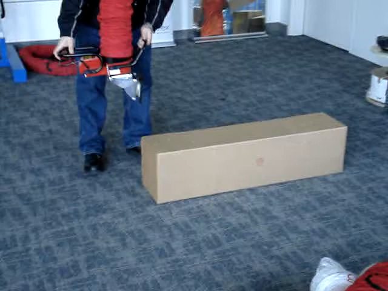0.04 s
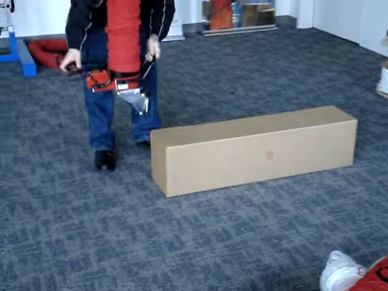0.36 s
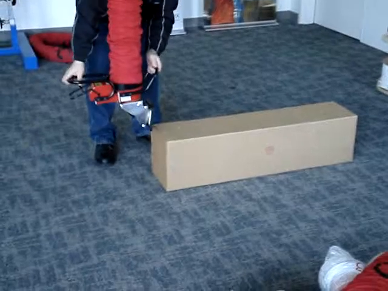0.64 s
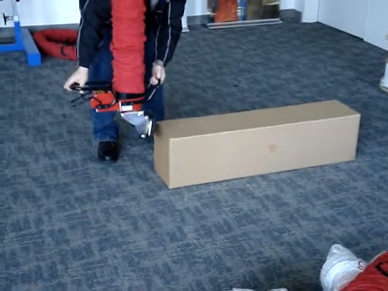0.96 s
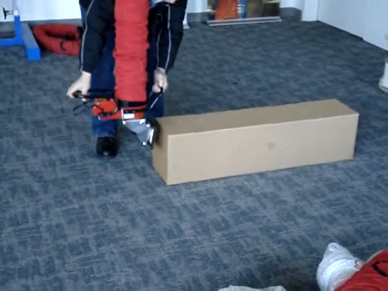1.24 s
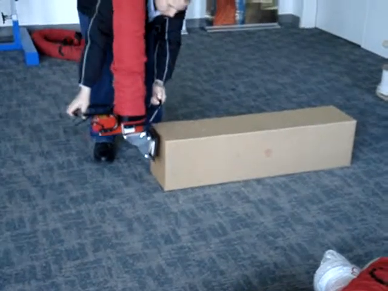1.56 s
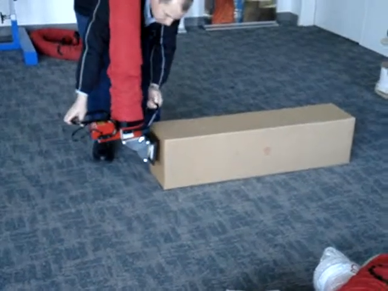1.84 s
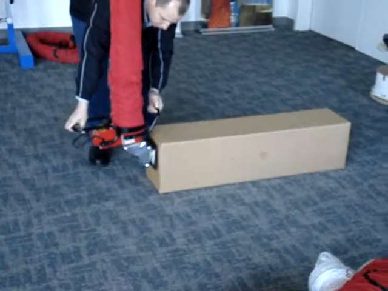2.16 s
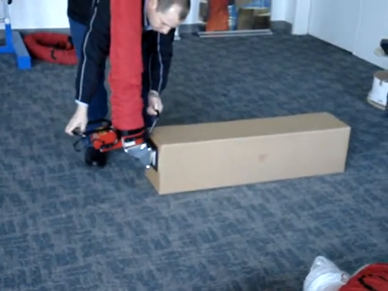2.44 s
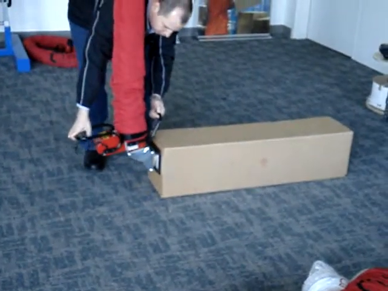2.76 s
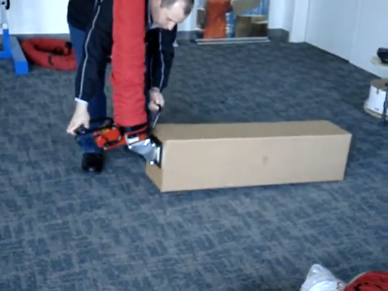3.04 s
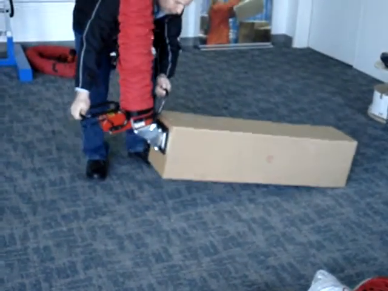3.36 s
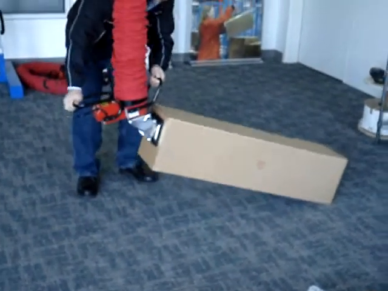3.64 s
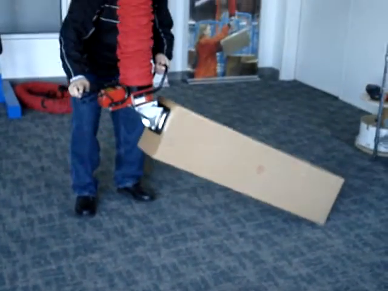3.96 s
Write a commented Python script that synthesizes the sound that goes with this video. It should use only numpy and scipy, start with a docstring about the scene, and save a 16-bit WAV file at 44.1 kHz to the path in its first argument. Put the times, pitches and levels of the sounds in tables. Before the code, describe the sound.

In a carpeted room, a vacuum lifter sucks air with a bright rush that gradually turns hollow. A rattling clack marks it sealing onto a cardboard box, followed by a leaking hiss and a drone, with a pump humming faintly underneath.

```python
"""Air rushes into the open suction foot of a vacuum tube lifter, ringing its cavity and sizzling at the rim.
The bright rush dulls to a hollow roar as the foot nears a cardboard box. The foot snaps on with a clack; from
then on air hisses through the leaking seal and a motor valve drones. The pump hums underneath, in a carpeted
room."""
import sys
import numpy as np
from scipy import signal
from scipy.fft import rfft, irfft
from scipy.io import wavfile

SR = 44100
rng = np.random.default_rng(int(sys.argv[2]) if len(sys.argv) > 2 else 0)


def wav_record(signal):
    """Record a signal, one row per channel, as 16-bit PCM in the file named by sys.argv[1]."""
    frames = np.transpose(np.atleast_2d(signal))
    bounded = np.clip(frames, -1, 1)
    # unit amplitude maps onto the largest positive 16-bit level
    quanta = np.round(bounded * 32767).astype(np.int16)
    wavfile.write(sys.argv[1], SR, quanta)


N = 176400
T = np.arange(N) / SR
SEAL_S = 2.851   # foot grips box

# Flow through the open foot: time_s, level_db
INTAKE_LEVEL = [(0.08, -20), (0.47, -19.5), (0.65, -22), (0.9, -25.5), (1.2, -28), (1.7, -29.5),
                (2.2, -32.5), (2.45, -37.5), (2.8, -38.5), (3.0, -53)]
# Rush spectrum: freq_hz, relative_db
INTAKE_SPECTRUM = [(100, -33.5), (280, -22.5), (440, -8), (530, -22), (650, -7.5), (900, -5.5),
                   (1100, -0.5), (1240, -2), (1450, 0), (1740, 3), (1900, -7.5), (2250, -6), (2520, -4.5),
                   (2950, -12.5), (4100, -14), (4700, -9), (5300, -9.5), (5900, -15.5), (7500, -17.5),
                   (10000, -34.5)]
# Foot cavity resonances: pitch_hz, width_hz, relative_db
FOOT_RESONANCES = [(457.4, 30, -18.5), (630, 25, -20), (731, 18, -19.5), (1108, 14, -12.5), (1548, 16, -16),
                   (1745, 120, -17), (2494, 22, -18.5), (3710, 70, -23), (4810, 620, -19)]
# Rim sizzle spectrum: freq_hz, relative_db
SIZZLE_SPECTRUM = [(1500, -13), (2600, 0), (4500, -13), (6000, -3), (7600, 3), (8500, -2.5), (10000, -16.5)]

def intake(full_flow_db=-19.5, full_sizzle_db=-26.5):
    """Air tears into the open foot, rings its cavity and, at full speed, sizzles at the rim."""
    flow = envelope(INTAKE_LEVEL)
    rush = flow * (noise(INTAKE_SPECTRUM) + resonant_noise(FOOT_RESONANCES))
    rush *= flutter(rate_hz=37, depth_db=0.37)
    sizzle_gain = from_db(full_sizzle_db) * (flow / from_db(full_flow_db)) ** 2.97
    return rush + sizzle_gain * noise(SIZZLE_SPECTRUM)


# Roar between foot and box: time_s, level_db
ROAR_LEVEL = [(0.08, -31), (0.3, -31), (0.5, -38.5), (0.75, -28.5), (1.1, -27.5), (1.55, -26.5),
              (2.25, -26), (2.48, -28), (2.85, -28.5), (3.0, -33.5), (3.2, -40)]
# Roar spectrum: freq_hz, relative_db
ROAR_SPECTRUM = [(80, -25), (170, -13.5), (250, -8), (350, -7), (480, -3), (540, -2), (720, 2), (830, -1),
                 (1040, -0.5), (1250, -7), (1600, -11.5), (2000, -20.5), (3500, -17), (4150, -26.5),
                 (4800, -18), (6000, -27.5), (10000, -50.5)]
# Tube resonances behind the gap: pitch_hz, width_hz, relative_db
TUBE_RESONANCES = [(293.5, 28, -20.5), (406, 38, -18.5), (529, 25, -10.5), (585, 20, -12), (622, 20, -10),
                   (706, 26, -9), (789, 26, -15.5), (852, 18, -15), (947, 22, -12.5), (1012, 25, -18)]
# Hiss of the closing gap: time_s, level_db
SQUEEZE_LEVEL = [(2.42, -43.5), (2.6, -32.5), (2.83, -30), (2.95, -32), (3.1, -38.5)]
# Closing hiss spectrum: freq_hz, relative_db
SQUEEZE_SPECTRUM = [(100, -12), (250, 1), (420, 3), (600, -7), (800, -22), (1050, 7), (1250, -4),
                    (1520, 1.5), (1900, -5.5), (2500, -6.5), (4000, -9.5), (5200, -16), (7000, -20.5),
                    (10000, -36)]

def gap():
    """Air between foot and box roars through the tube's resonances, then hisses as the gap closes."""
    hollow = unit_rms(noise(ROAR_SPECTRUM) + resonant_noise(TUBE_RESONANCES))
    roar = envelope(ROAR_LEVEL) * hollow * flutter(rate_hz=36, depth_db=0.84)
    return roar + envelope(SQUEEZE_LEVEL) * noise(SQUEEZE_SPECTRUM)


# Lip spurt spectrum: freq_hz, relative_db
SPURT_SPECTRUM = [(1800, 4), (3500, -6), (5500, -1), (6800, 1), (8500, -16)]
# Leak hiss spectrum: freq_hz, relative_db
LEAK_SPECTRUM = [(200, -4.5), (400, 1), (1150, 2.5), (1550, 4), (2050, -0.5), (2500, 0), (2950, 0),
                 (3350, 0), (4200, 0.5), (5150, 2), (6000, -1.5), (7600, -3), (8300, -6), (9400, -7.5),
                 (11000, -36)]
# Faint leak whistles: pitch_hz, width_hz, relative_db
LEAK_WHISTLES = [(1337, 12, -18.5), (1570, 16, -19.5), (1990, 12, -23), (3355, 65, -16.5)]

def seal(rise_s=0.0036, spurt_db=-32, leak_db=-31):
    """Air spurts as the lip closes, then hisses and whistles in through the cardboard."""
    sealed = np.clip((T - SEAL_S) / rise_s, 0, 1)
    spurt = from_db(spurt_db) * decay_from_seal(t60_s=0.5) * noise(SPURT_SPECTRUM)
    leak = from_db(leak_db) * (noise(LEAK_SPECTRUM) + resonant_noise(LEAK_WHISTLES))
    leak *= flutter(rate_hz=30, depth_db=0.5)
    return sealed * (spurt + leak)


# Motor valve drone: time_s, level_db
DRONE_LEVEL = [(2.85, -46), (3.05, -31.5), (3.3, -32.5), (3.55, -30.5), (3.78, -28.5), (4.0, -29.5)]
# Drone spectrum: freq_hz, relative_db
DRONE_SPECTRUM = [(120, -31), (240, -13), (330, -19.5), (430, -15), (510, -7.5), (570, -8), (680, 0),
                  (770, -6.5), (850, -4.5), (980, -17), (1400, -39)]

def motor_valve():
    """A motor valve drones once the foot grips."""
    return envelope(DRONE_LEVEL) * noise(DRONE_SPECTRUM) * flutter(rate_hz=20, depth_db=0.4)


# Foot-on-box contacts: start_s, impulse_db, lowpass_hz
KNOCKS = [(0.988, -16, 3000), (2.776, -5, 900), (2.8513, -11, 9000), (2.854, -14, 7000), (2.871, -22, 6000),
          (2.888, -25, 2980), (2.921, -19, 6000), (3.372, -10, 899)]
# Foot and box modes: pitch_hz, gain_db, t60_s
BOX_MODES = [(615, -17.5, 0.071), (810, -11, 0.018), (1052, -10.5, 0.042), (1553, -15.5, 0.066),
             (2280, -13, .04), (2500, -7.5, 0.038), (2650, -8.5, 0.028), (2840, -14, 0.024),
             (5140, -18.5, .03), (6730, -17, 0.018)]

def clack():
    """The foot strikes the box: dull knocks before and after a bright, rattling clack."""
    blows = np.zeros(N)
    for start_s, impulse_db, lowpass_hz in KNOCKS:
        impulse = from_db(impulse_db) * (np.arange(N) == int(start_s * SR))
        pole = np.exp(-2 * np.pi * lowpass_hz / SR)
        blows += signal.lfilter([(1 - pole) ** 2], [1, -2 * pole, pole ** 2], impulse + 1e-18)
    return sum((-1) ** k * from_db(gain_db) * resonator(blows, pitch_hz, t60_s)
               for k, (pitch_hz, gain_db, t60_s) in enumerate(BOX_MODES))


# Metal foot ring: pitch_hz, width_hz, initial_db
PING_RESONANCES = [(2272, 100, -36), (2454, 60, -36), (2650, 43, -33), (2780, 97, -42)]

def foot_ping():
    """The metal foot rings on in the room after the grip."""
    return resonant_noise(PING_RESONANCES) * (T > SEAL_S) * decay_from_seal(t60_s=1.3)


def box_boom(pitch_hz=238, peak_db=-28.5, delay_s=0.033, width_s=0.034):
    """The box wall booms as it is sucked in."""
    swell = np.exp(-((T - SEAL_S - delay_s) / width_s) ** 2)
    return from_db(peak_db) * swell * np.sin(2 * np.pi * pitch_hz * T)


# Motor tones: pitch_hz, base_db
HUM_TONES = [(54, -66.5), (91, -61), (120, -52.5), (240, -48.5)]
# Hum gain with pump load: time_s, gain_db
PUMP_LOAD = [(0, -0.5), (0.55, -4.5), (1.4, -1), (2.7, 1.5), (3.3, .5), (4, 0.5)]

def pump():
    """The motor's tones waver, dip early on and grow as the pump takes load."""
    hum = np.zeros(N)
    for pitch_hz, base_db in HUM_TONES:
        tone = unit_rms(np.sin(2 * np.pi * (pitch_hz * T + rng.random())))
        hum += from_db(base_db) * tone * flutter(rate_hz=4, depth_db=1.5)
    return envelope(PUMP_LOAD) * hum


# Draught spectrum: freq_hz, relative_db
DRAUGHT_SPECTRUM = [(20, 1), (70, -4), (160, -2), (450, 0), (600, -7)]
# Background rumble: time_s, level_db
RUMBLE_LEVEL = [(0, -60), (0.55, -68), (0.95, -58), (1.7, -54.5), (2.25, -51.5), (2.85, -54), (3.4, -55),
                (4, -55)]
# Rumble spectrum: freq_hz, relative_db
RUMBLE_SPECTRUM = [(20, -14), (35, -8), (52, 1.5), (70, -3.5), (100, 0.5), (200, -5), (400, -13),
                   (1000, -43)]

def background(draught_db=-44.5, end_s=0.47, fade_s=0.15):
    """A low draught flutters at first; a faint rumble runs throughout."""
    draught = from_db(draught_db) * np.clip((end_s - T) / fade_s, 0, 1) * noise(DRAUGHT_SPECTRUM)
    return draught + envelope(RUMBLE_LEVEL) * noise(RUMBLE_SPECTRUM)


def room(x, level_db, t60_s):
    """Diffuse reflections, starting after 6 ms."""
    tail = rng.standard_normal(N) * from_db(-60 * T / t60_s) * (T > 0.006)
    return from_db(level_db) * signal.fftconvolve(x, tail / np.sqrt(np.sum(tail ** 2)))[:N]


def from_db(db):
    """Decibels to gain."""
    return 10 ** (np.asarray(db) / 20)


def unit_rms(x):
    """Scale to unit rms."""
    return x / np.sqrt(np.mean(x ** 2) + 1e-20)


def envelope(curve):
    """Gain along a level curve, falling 200 dB/s beyond its ends."""
    time_s, level_db = np.transpose(curve)
    outside_s = np.maximum(time_s[0] - T, 0) + np.maximum(T - time_s[-1], 0)
    return from_db(np.interp(T, time_s, level_db) - 200 * outside_s)


def decay_from_seal(t60_s):
    """Gain of 1 at the grip, falling exponentially either side."""
    return from_db(-60 * np.abs(T - SEAL_S) / t60_s)


def noise(spectrum):
    """Unit-rms shaped noise, falling 12 dB/octave beyond the spectrum's ends."""
    freq_hz, relative_db = np.transpose(spectrum)
    points_oct = np.log2(freq_hz)
    bins_oct = np.log2(np.fft.rfftfreq(N, 1 / SR) + 1)
    outside_oct = np.maximum(points_oct[0] - bins_oct, 0) + np.maximum(bins_oct - points_oct[-1], 0)
    gain = from_db(np.interp(bins_oct, points_oct, relative_db) - 12 * outside_oct)
    return unit_rms(irfft(rfft(rng.standard_normal(N)) * gain, N))


def flutter(rate_hz, depth_db):
    """Turbulent gain wobble, mostly slower than rate_hz."""
    lowpass = 1 / (1 + (np.fft.rfftfreq(N, 1 / SR) / rate_hz) ** 2)
    wobble = irfft(rfft(rng.standard_normal(N)) * lowpass, N)
    return from_db(depth_db * unit_rms(wobble))


def resonator(x, pitch_hz, t60_s):
    """Band-pass mode: a unit impulse rings as a decaying cosine of height 1."""
    radius, angle = from_db(-60 / (t60_s * SR)), 2 * np.pi * pitch_hz / SR
    return signal.lfilter([0.5, 0, -0.5], [1, -2 * radius * np.cos(angle), radius ** 2], x + 1e-18)


def resonant_noise(resonances):
    """Narrow resonances, each driven by its own noise."""
    total = np.zeros(N)
    for pitch_hz, width_hz, level_db in resonances:
        t60_s = np.log(1000) / (np.pi * width_hz)
        total += from_db(level_db) * unit_rms(resonator(rng.standard_normal(N), pitch_hz, t60_s))
    return total


def scene():
    """Mono mix; near walls colour the air noise and the clack reverberates."""
    air = intake() + gap() + seal() + motor_valve()
    walls_db = -12.5
    air += room(air, walls_db, t60_s=0.26)
    air /= np.hypot(1, from_db(walls_db))   # constant power
    knocks = clack()
    knocks += room(knocks, level_db=-5.5, t60_s=0.5)
    return (air + knocks + foot_ping() + box_boom() + pump() + background())[None]


def record(dry):
    """The sound cuts in; a steep low-pass removes the top treble."""
    start_s, rise_s, cutoff_hz = 0.0785, 0.0038, 10100
    opened = dry * np.clip((T - start_s) / rise_s, 0, 1)
    return signal.sosfilt(signal.ellip(12, 0.1, 80, cutoff_hz, fs=SR, output="sos"), opened)


dry = scene()
out = record(dry)
wav_record(out)
```